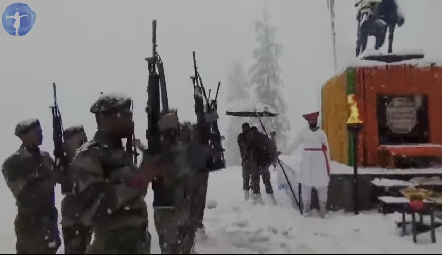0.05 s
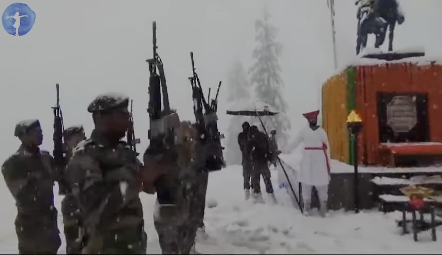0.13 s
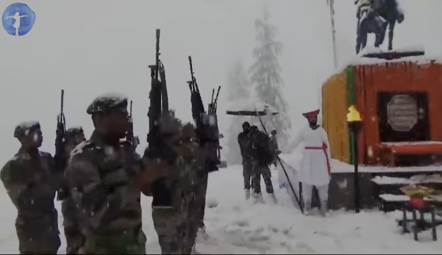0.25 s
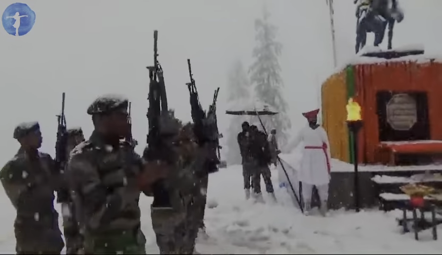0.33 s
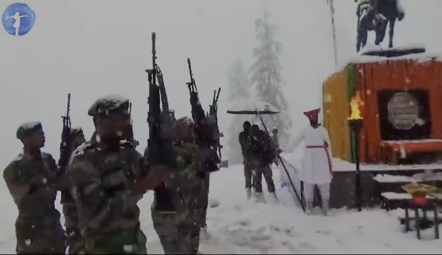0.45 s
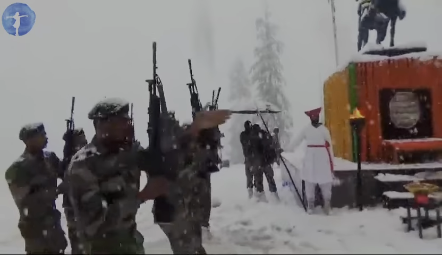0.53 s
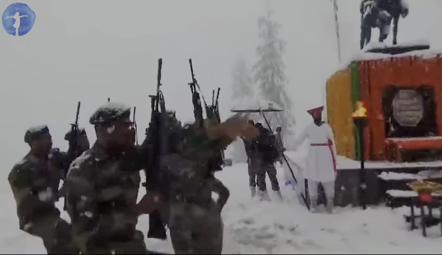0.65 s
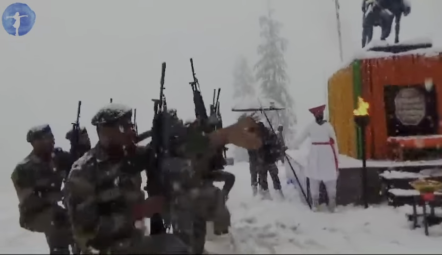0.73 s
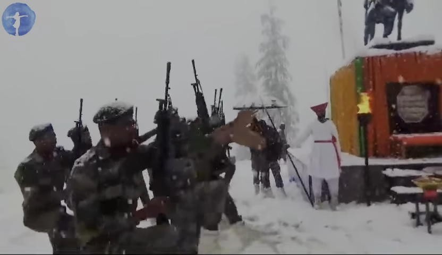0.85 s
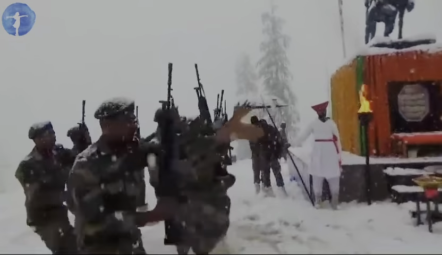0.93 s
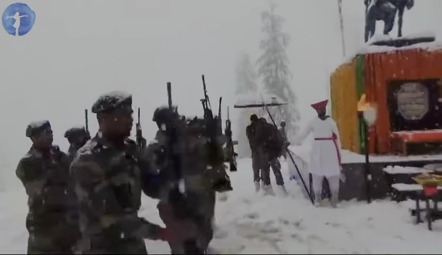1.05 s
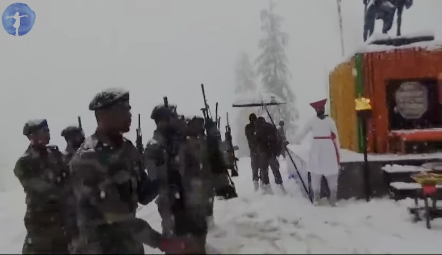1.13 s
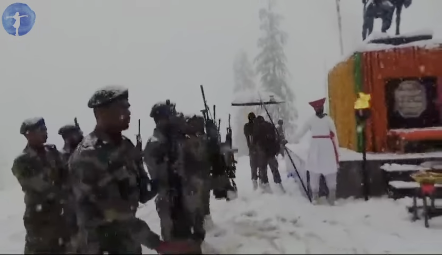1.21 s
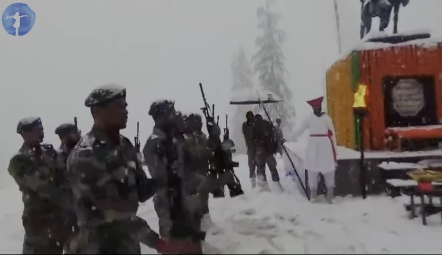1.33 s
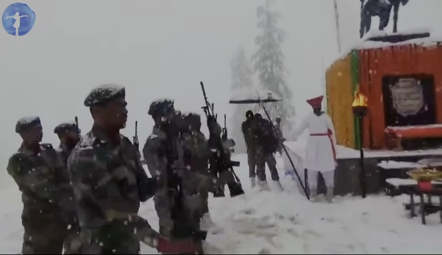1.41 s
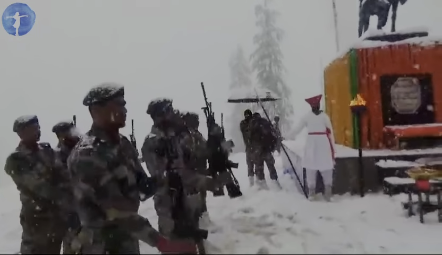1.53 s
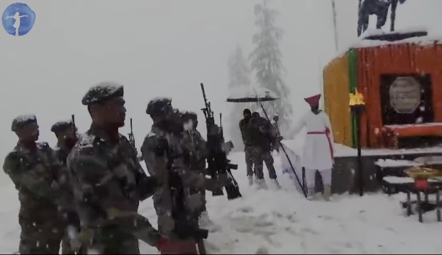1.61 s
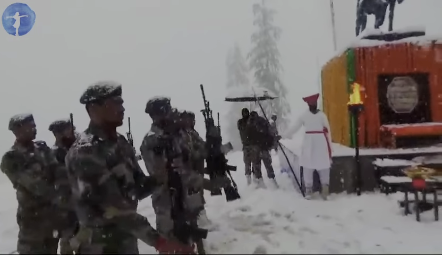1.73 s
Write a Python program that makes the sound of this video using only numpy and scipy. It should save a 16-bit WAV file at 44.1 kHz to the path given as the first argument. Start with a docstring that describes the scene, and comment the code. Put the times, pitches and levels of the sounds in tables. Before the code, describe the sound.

Hands slap rifles in a ragged volley from about 0.25 to 0.4 seconds, each crack rattling loose parts. Another slap comes at 0.5, then hollow stock knocks, rustling uniforms and a sharp metal tick at 0.8. A second volley runs from 1.05 to 1.2 seconds, with heavier thumps of rifles against bodies. Faint ticks and rustle fade by 1.8 seconds in quiet open air with barely any echo.

```python
"""Rifle drill in snow.

Hands slap the rifles in two ragged volleys; each slap cracks, rattles loose parts and rings the rifle.
Stocks knock hollow, fittings tick, and rifles thump against bodies, hardest in the second volley.
Uniforms rustle; the snow leaves only a faint tail over quiet open air."""
import sys
import numpy as np
from scipy import signal
from scipy.fft import rfft, irfft
from scipy.io import wavfile

SR = 44100
rng = np.random.default_rng(int(sys.argv[2]) if len(sys.argv) > 2 else 0)


def transcribe(signal):
    """Save signal, clipped to [-1, 1], as a 16-bit WAV file at the path in sys.argv[1]."""
    frames = np.atleast_2d(signal).T
    limited = np.clip(frames, -1, 1)
    pcm = np.round(limited * 32767).astype(np.int16)
    wavfile.write(sys.argv[1], SR, pcm)


N = 79380
T = np.arange(N) / SR

# hand slaps: start_s, body_db, clack_db, clatter_db, sizzle_db, base_t60_s
HAND_SLAPS = [(0.2401, -23.5, -23, -20, -15.5, 0.093), (.248, -26.5, -35, -23, -19, .06),
              (.2625, -16, -20.5, -20, -21.5, 0.08), (.276, -19, -18, -22.5, -19.5, 0.06),
              (0.3004, -25.5, -16.5, -17.5, -17.5, 0.034), (.308, -21, -21, -24, -26, 0.11),
              (0.3196, -26, -18.5, -17.5, -16, 0.054), (.340, -24.5, -21.5, -29, -35, 0.044),
              (.351, -26, -22, -23.5, -23, 0.043), (.359, -23, -27, -27, -24, 0.023),
              (.374, -26, -20.5, -51, -24, 0.017), (0.394, -47, -46, -39.5, -39.5, 0.11),
              (.5155, -25.5, -32.5, -24.5, -23, 0.016), (.519, -33.5, -29, -19, -17.5, 0.0096),
              (1.0546, -26.5, -18, -22.5, -29.5, 0.037), (1.074, -29.5, -36, -32.5, -31, 0.078),
              (1.087, -26, -23, -28.5, -30, 0.033), (1.096, -26, -23.5, -22, -20.5, .04),
              (1.101, -22, -22.5, -26, -22, 0.074), (1.108, -18.5, -22.5, -27.5, -22, 0.036),
              (1.114, -30, -22, -23.5, -27.5, 0.026), (1.129, -44, -26, -41, -21.5, 0.0083),
              (1.136, -23.5, -17, -21, -22.5, 0.023), (1.148, -35, -32.5, -35, -37, 0.12),
              (1.1675, -25, -18.5, -24, -23.5, 0.019), (1.183, -29, -28.5, -44, -36, 0.034),
              (1.204, -39, -43.5, -46.5, -52, 0.13), (1.275, -48, -46.5, -42, -56, 0.033),
              (1.339, -43.5, -40, -44, -42, 0.011)]
# body, clack, clatter and sizzle bands: low_hz, high_hz, t60_ratio
CONTACT_BANDS = [(527, 1040, 1.46), (1058, 1970, 1.24), (2496, 5495, 1.95), (5090, 10280, 1.69)]
# rifle resonances: pitch_hz, t60_s, gain_db
RIFLE_RESONANCES = [(686, 0.061, 0), (840, 0.054, -16), (1530, 0.032, 0), (1940, 0.081, -47),
                    (3460, 0.035, -5), (5730, 0.04, -28)]
# stock knocks: start_s, pitch_hz, hollow_db, clack_db, clatter_db, sizzle_db, base_t60_s
STOCK_KNOCKS = [(0.0511, 730, -19, -28, -30, -31, 0.02), (0.0842, 960, -30, -32.5, -62, -50, 0.04),
                (.6445, 756, -19, -21.5, -29, -34, 0.031), (.649, 770, -16.5, -26, -31, -32, 0.027),
                (.695, 740, -25, -36, -37.5, -44, 0.058), (.722, 700, -22, -34.5, -35.5, -37.5, 0.035),
                (.978, 660, -34, -45.5, -55, -72, 0.077), (1.113, 655, -14.5, -36, -41, -25, 0.057)]
# blows on cloth and body: time_s, pitch_hz, peak_db, half_rise_s
BODY_THUMPS = [(0.0504, 400, -42, 0.0014), (0.239, 190, -31, 0.0018), (0.273, 259, -27.5, 0.0038),
               (0.299, 205, -36, 0.0068), (0.355, 274, -21.5, 0.0023), (.516, 220, -22.5, .0016),
               (.553, 206, -44, 0.014), (.59, 126, -40.5, 0.0081), (.643, 177, -32, 0.0034),
               (0.699, 123, -40.5, 0.0045), (1.058, 454, -26, 0.001), (1.086, 151, -16.5, 0.0029),
               (1.109, 281, -14, 0.0047), (1.118, 97, -24, 0.0081), (1.1653, 161, -11, 0.0026),
               (1.187, 169, -28.5, 0.0107)]
# metal fittings: start_s, click_db, ring_hz, ring_db
FITTING_TICKS = [(.004, -63, 3430, -35), (0.041, -38, 5900, -44), (0.0956, -36, 4280, -43),
                 (.113, -50, 2910, -37), (0.123, -35.5, 8700, -35), (0.195, -44, 2700, -48),
                 (.509, -46, 2750, -29.5), (.541, -49, 2950, -29), (0.7927, -20, 3040, -21.5),
                 (1.68, -37, 3650, -45), (1.73, -38, 6300, -57)]
# rustle of uniforms and slings: time_s, level_db
RUSTLE_LEVEL = [(0, -46), (.1, -54), (.22, -52.5), (.39, -44.5), (.48, -46.5), (.53, -42), (.565, -35.5),
                (.62, -41.5), (.70, -41.5), (.78, -47.5), (.9, -51), (1.04, -52), (1.2, -40), (1.32, -50.5),
                (1.55, -55), (1.68, -53), (1.8, -57)]
# cloth spectrum: freq_hz, relative_db
CLOTH_SPECTRUM = [(60, -53), (200, 8.5), (450, 6.5), (700, -20.5), (1100, 4.5), (2200, -0.5), (5000, -6),
                  (8500, 0), (12000, -16)]
# open-air spectrum: freq_hz, relative_db
AIR_SPECTRUM = [(15, -35), (25, 0), (69, -0.5), (178, -9.5), (401, -20.5), (505, -48), (668, 0),
                (1430, -53), (2390, -21.5), (2930, -17), (8310, -31.5), (11000, -24), (14300, -60),
                (22000, -120)]
# hollow background band: time_s, level_db
HOLLOW_LEVEL = [(0, -42), (.2, -53.5), (.6, -47), (.72, -45), (.85, -59), (1.04, -46.5), (1.4, -57.5),
                (1.8, -70)]
# phase between microphone ports: freq_hz, left_lead_rad
PORT_LEAD = [(30, -.6), (160, -.7), (350, -.55), (800, -.26), (2000, -.1), (11000, -.02)]
# level between ports: freq_hz, left_minus_right_db
PORT_TILT = [(150, -1.4), (1000, -.4), (5000, .3)]


def hand_slaps():
    """Hands strike one after another; each clatter rings its rifle."""
    out = np.zeros(N)
    for start_s, *levels_db, base_t60_s in HAND_SLAPS:
        add(out, start_s, clatter(levels_db, CONTACT_BANDS, base_t60_s))
    return out + rifle_ring(out)


def clatter(levels_db, bands, base_t60_s, grains_per_s=2800, grain_db=-4, crack_db=-3.5, crack_s=0.00022):
    """One contact: a crack, then a dying rattle of loose parts, with level and decay set per band."""
    t = T[:N // 12]
    rattle = rng.standard_normal(len(t)) + undb(grain_db) * grains(grains_per_s, len(t))
    rattle *= 1 + undb(crack_db) * np.exp(-t / crack_s)
    out = 0
    for level_db, (low_hz, high_hz, t60_ratio) in zip(levels_db, bands):
        envelope = decay(t, base_t60_s * t60_ratio)
        burst = unit_energy(band(rattle * envelope, low_hz, high_hz))
        out += undb(level_db) * burst * np.sqrt(np.sum(envelope ** 2))
    return out


def rifle_ring(drive):
    """Contacts drive the rifle's damped modes."""
    t = T[:N // 8]
    response = 0
    for pitch_hz, t60_s, gain_db in RIFLE_RESONANCES:
        envelope = decay(t, t60_s)
        response += undb(gain_db) * 2 * envelope / envelope.sum() * np.cos(2 * np.pi * pitch_hz * t)
    return convolve(drive, response)


def stock_knocks():
    """A lighter contact sounds a stock's hollow note under a small clatter."""
    out, t = np.zeros(N), T[:N // 12]
    for start_s, pitch_hz, hollow_db, *levels_db, base_t60_s in STOCK_KNOCKS:
        note = undb(hollow_db) * decay(t, base_t60_s) * np.sin(2 * np.pi * pitch_hz * t)
        add(out, start_s, note + clatter(levels_db, CONTACT_BANDS[1:], base_t60_s))
    return out


def body_thumps(sharpness=4.1, scuff_db=-8, scuff_hz=(93, 349)):
    """A padded blow swells and dies within a few cycles, with a dull scuff."""
    out, t = np.zeros(N), T[:N // 16]
    for time_s, pitch_hz, peak_db, half_rise_s in BODY_THUMPS:
        lead_s = half_rise_s / 2
        progress = t / (2 * half_rise_s)
        envelope = (progress * np.exp(1 - progress)) ** sharpness
        tone = -np.sin(2 * np.pi * pitch_hz * (t - lead_s))
        scuff = undb(scuff_db) * band_noise(len(t), *scuff_hz)
        add(out, time_s - lead_s, undb(peak_db) * envelope * (tone + scuff))
    return out


def fitting_ticks(click_hz=(5200, 10000), click_t60_s=.008, ring_t60_s=.014,
                  overtone_ratio=1.405, overtone_db=-1):
    """Swivels and buckles click with a short two-note ring."""
    out, t = np.zeros(N), T[:N // 30]
    for start_s, click_db, ring_hz, ring_db in FITTING_TICKS:
        click = undb(click_db) * decay(t, click_t60_s) * band_noise(len(t), *click_hz)
        phase = 2 * np.pi * ring_hz * t
        notes = np.sin(phase) + undb(overtone_db) * np.sin(overtone_ratio * phase)
        add(out, start_s, click + undb(ring_db) * decay(t, ring_t60_s) * notes)
    return out


def uniform_rustle(grains_per_s=1100, grain_db=-3, flutter_db=2.5, flutter_hz=(10, 76.5)):
    """Stiff cloth rubs and crackles as the arms move."""
    rub = rng.standard_normal(N) + undb(grain_db) * grains(grains_per_s, N)
    flutter = undb(flutter_db * band_noise(N, *flutter_hz))
    return unit_rms(colour(rub, CLOTH_SPECTRUM) * flutter) * gain_curve(RUSTLE_LEVEL)


def reflections(x, t60_s):
    """Diffuse reflections die away."""
    t = T[:N // 3]
    return convolve(x, unit_energy(rng.standard_normal(len(t)) * decay(t, t60_s)))


def open_air(hiss_db=-58, hollow_hz=(560, 863), waver_db=3.5, waver_hz=(3.2, 14.6),
             rumble_db=-64.5, rumble_hz=(44.3, 84.4)):
    """Quiet air with a wavering hollow band and a low rumble."""
    hiss = unit_rms(colour(rng.standard_normal(N), AIR_SPECTRUM))
    waver = undb(waver_db * band_noise(N, *waver_hz))
    hollow = unit_rms(band_noise(N, *hollow_hz) * waver)
    rumble = unit_rms(band_noise(2 * N, *rumble_hz)[N:])  # settled half only
    return undb(hiss_db) * hiss + undb(rumble_db) * rumble + gain_curve(HOLLOW_LEVEL) * hollow


def undb(db):
    return 10 ** (np.asarray(db) / 20)


def unit_rms(x):
    return x / np.sqrt(np.mean(x ** 2))


def unit_energy(x):
    return x / np.sqrt(np.sum(x ** 2))


def decay(t, t60_s):
    return np.exp(-np.log(1000) * t / t60_s)


def gain_curve(rows):
    """Gain per sample from time_s, level_db rows."""
    return undb(np.interp(T, *np.array(rows).T))


def per_bin(rows):
    """Value per FFT bin from freq_hz, value rows."""
    freq_hz, value = np.array(rows).T
    bin_hz = np.arange(N // 2 + 1) * SR / N
    return np.interp(np.log(bin_hz + 1), np.log(freq_hz), value)


def colour(x, spectrum):
    return irfft(rfft(x) * undb(per_bin(spectrum)), N)


def band(x, low_hz, high_hz):
    edges_hz = [low_hz, min(high_hz, SR / 2 - 100)]
    return signal.sosfilt(signal.butter(3, edges_hz, btype="band", fs=SR, output="sos"), x)


def band_noise(size, low_hz, high_hz):
    return unit_rms(band(rng.standard_normal(size), low_hz, high_hz))


def grains(rate_per_s, size):
    """Random clicks of random strength, rms 1."""
    return unit_rms((rng.random(size) < rate_per_s / SR) * rng.standard_normal(size) + 1e-9)


def convolve(x, response):
    return signal.fftconvolve(x, response)[:len(x)]


def add(out, start_s, x):
    i = max(int(start_s * SR), 0)
    out[i:i + len(x)] += x[:N - i]


def scene(low_cut_hz=75, tail_db=-15, tail_delay_s=.012, ranks_db=-2, side_db=-14.3):
    """Drill and faint tail in front; diffuse clatter, rustle, air and reflections to the sides."""
    hits = hand_slaps() + stock_knocks() + body_thumps() + fitting_ticks()
    hits = band(hits, low_cut_hz, SR / 2)
    mid = hits + uniform_rustle() + open_air()
    add(mid, tail_delay_s, undb(tail_db) * reflections(hits, t60_s=.24))
    diffuse = hand_slaps() + uniform_rustle() + open_air()  # fresh noise, uncorrelated with mid
    off_ranks = undb(ranks_db) * reflections(hits, t60_s=.12)
    side = undb(side_db) * (diffuse + off_ranks)
    return np.array([mid + side, mid - side])


def record(dry, ceiling=.7, top_hz=11100):
    """Two microphone ports differ slightly in phase and level; peaks are rounded, the top is cut."""
    port = np.exp(1j * per_bin(PORT_LEAD) / 2) * undb(per_bin(PORT_TILT) / 2)
    left = irfft(rfft(dry[0]) * port, N)
    right = irfft(rfft(dry[1]) / port, N)
    rounded = ceiling * np.tanh(np.array([left, right]) / ceiling)
    return signal.sosfilt(signal.ellip(14, .2, 80, top_hz, fs=SR, output="sos"), rounded)


dry = scene()
out = record(dry)
transcribe(out)
```